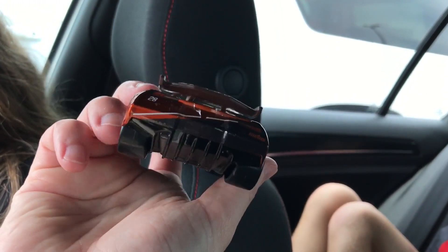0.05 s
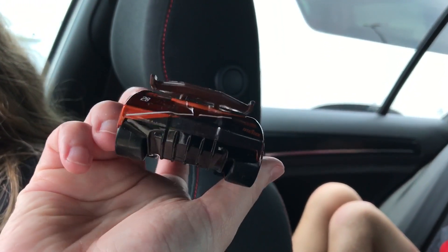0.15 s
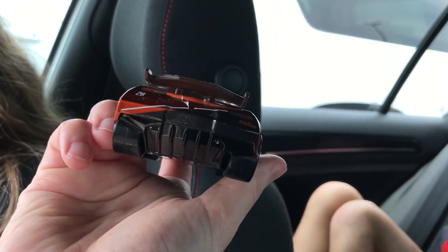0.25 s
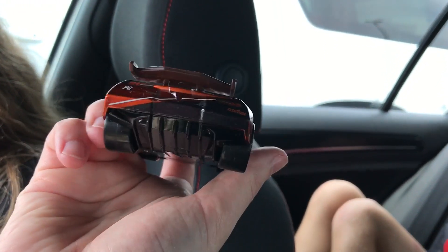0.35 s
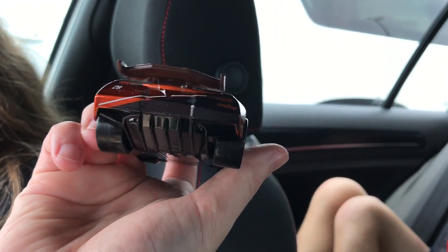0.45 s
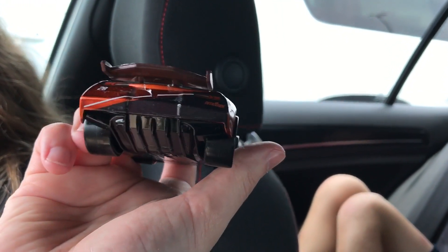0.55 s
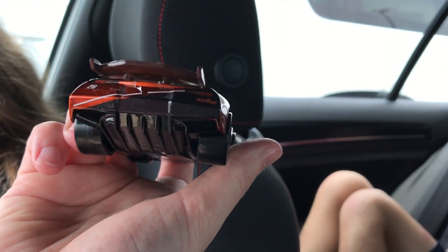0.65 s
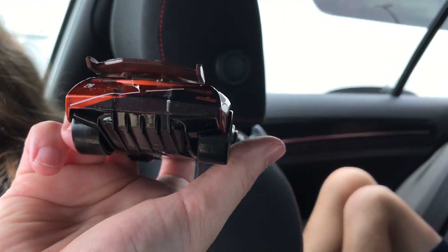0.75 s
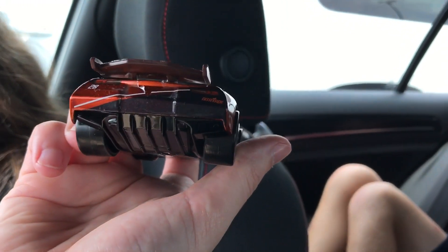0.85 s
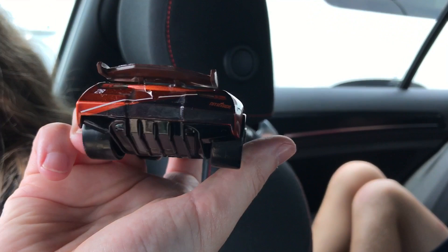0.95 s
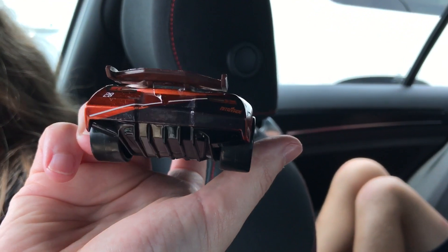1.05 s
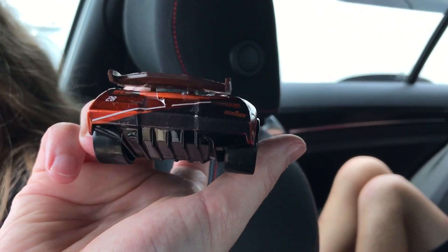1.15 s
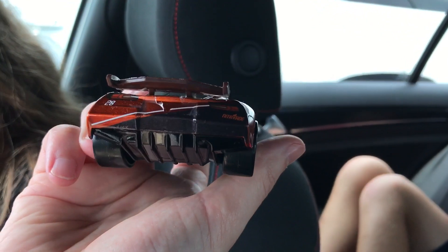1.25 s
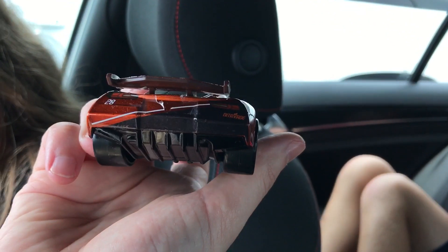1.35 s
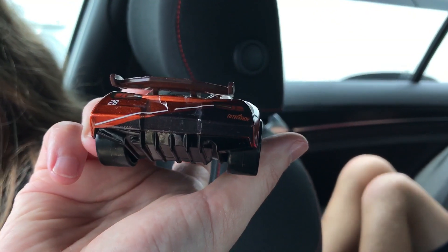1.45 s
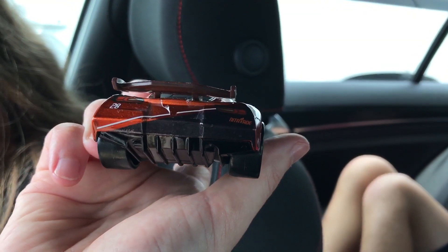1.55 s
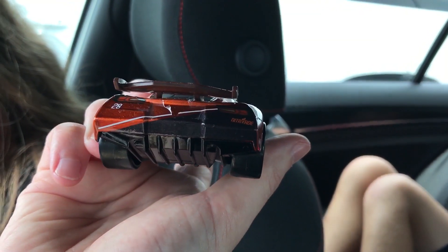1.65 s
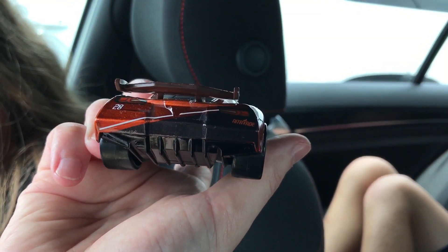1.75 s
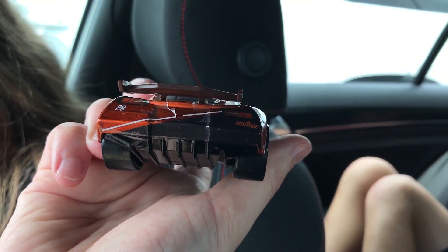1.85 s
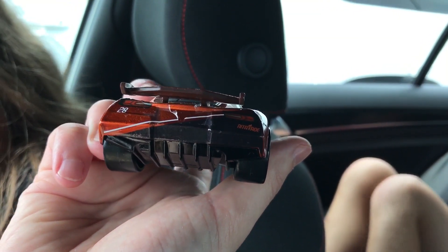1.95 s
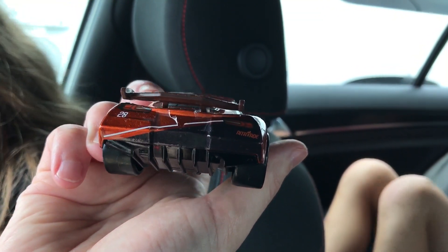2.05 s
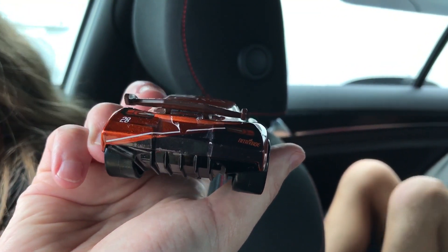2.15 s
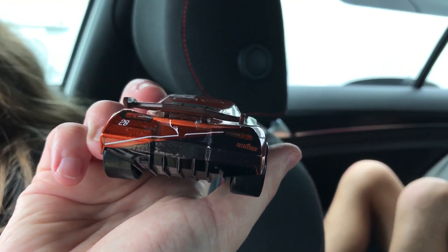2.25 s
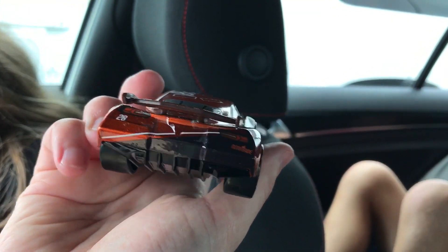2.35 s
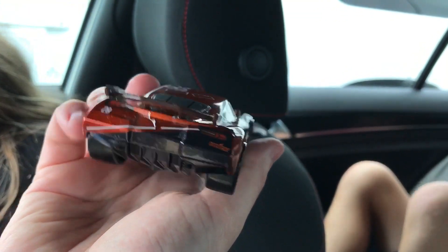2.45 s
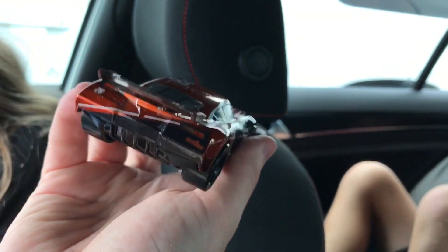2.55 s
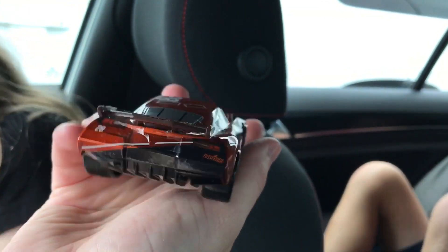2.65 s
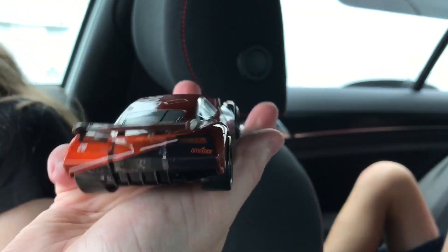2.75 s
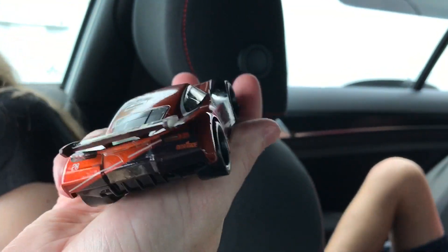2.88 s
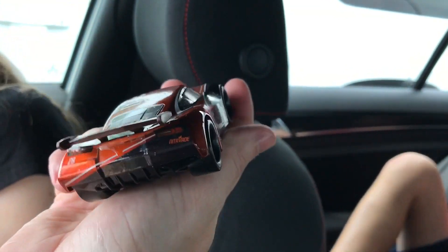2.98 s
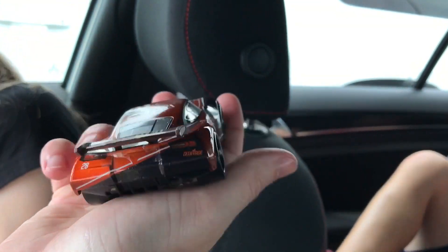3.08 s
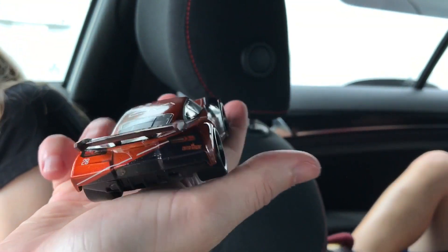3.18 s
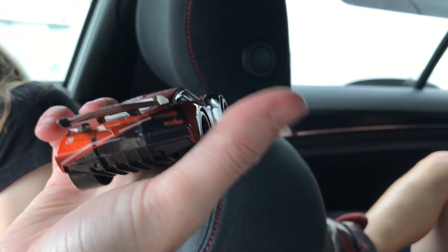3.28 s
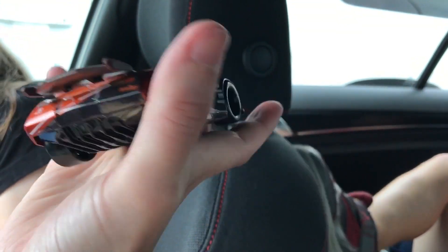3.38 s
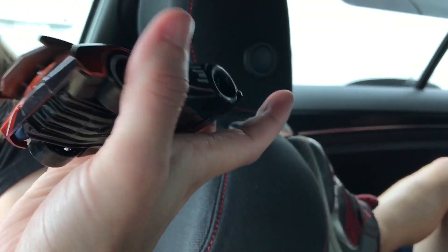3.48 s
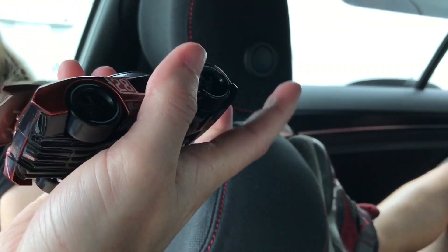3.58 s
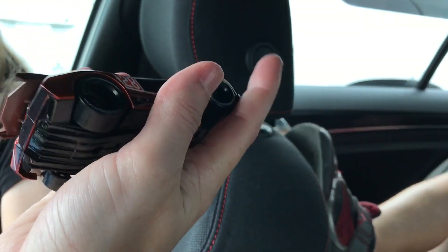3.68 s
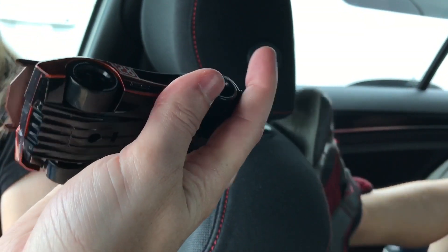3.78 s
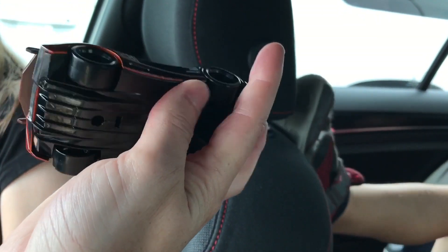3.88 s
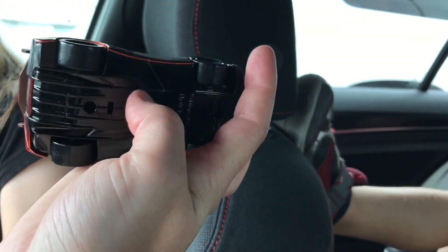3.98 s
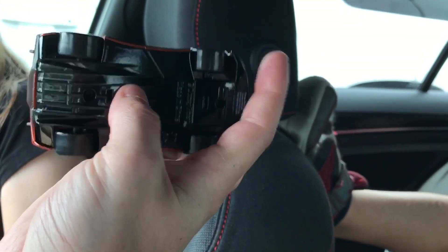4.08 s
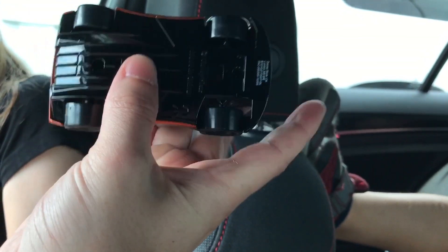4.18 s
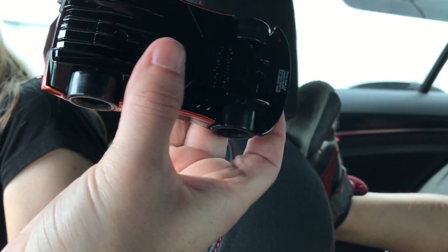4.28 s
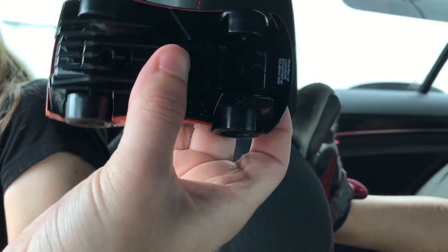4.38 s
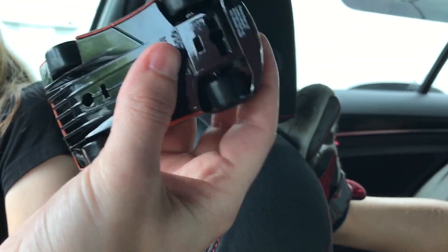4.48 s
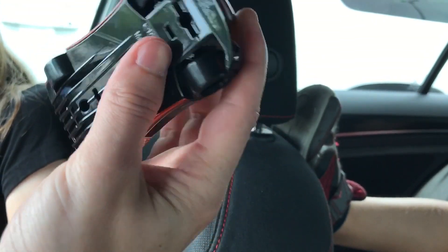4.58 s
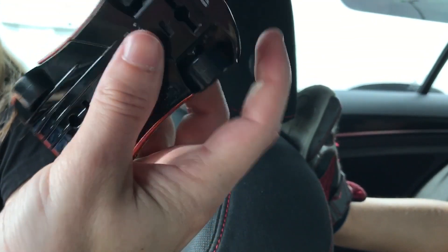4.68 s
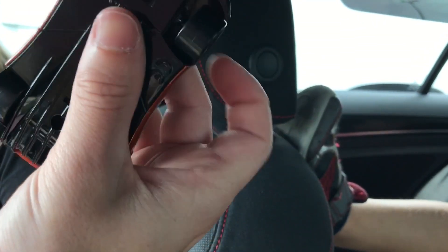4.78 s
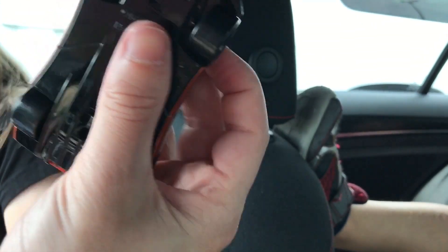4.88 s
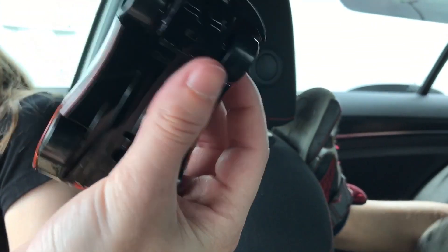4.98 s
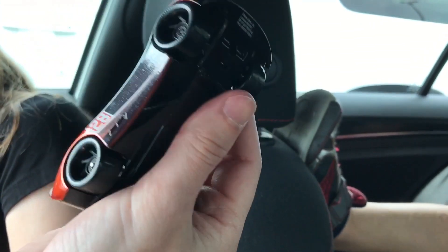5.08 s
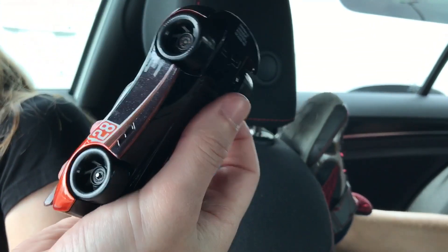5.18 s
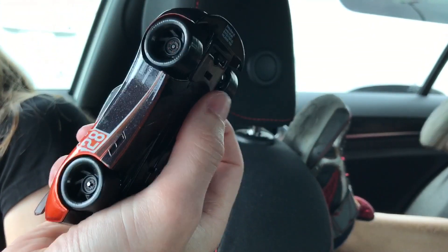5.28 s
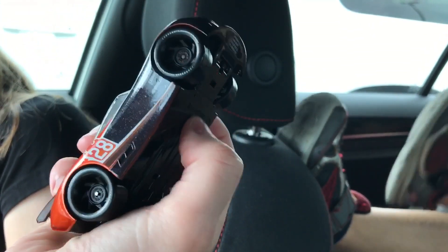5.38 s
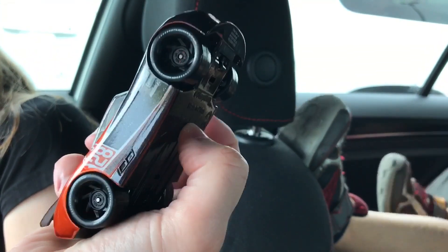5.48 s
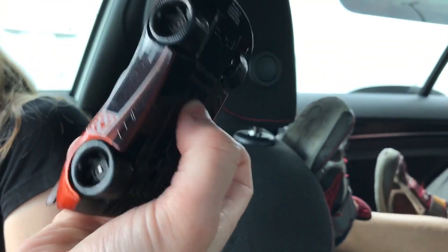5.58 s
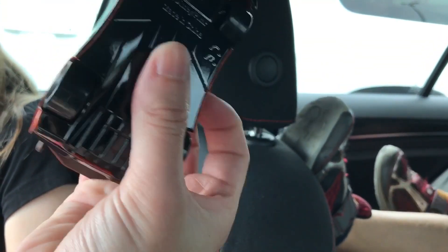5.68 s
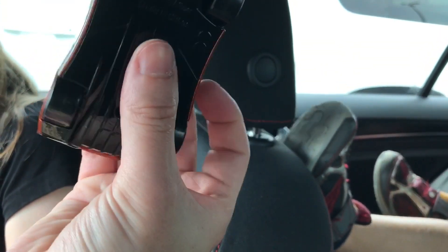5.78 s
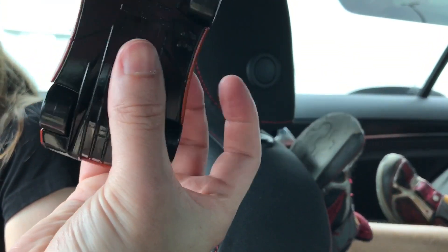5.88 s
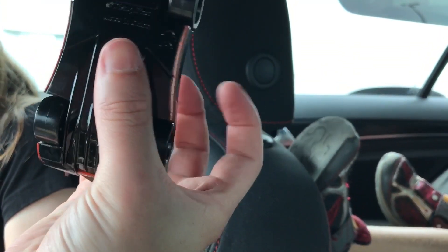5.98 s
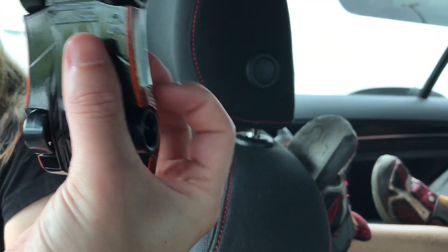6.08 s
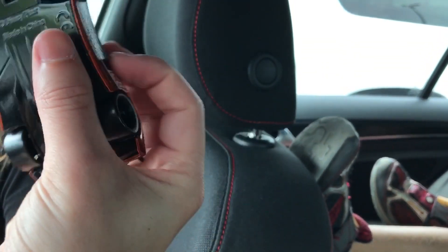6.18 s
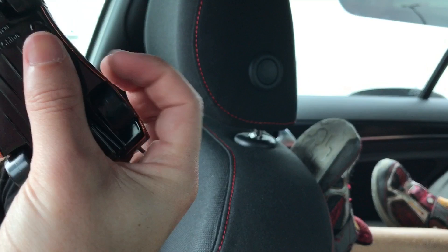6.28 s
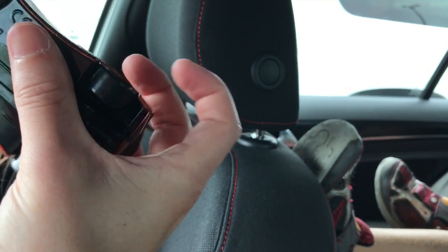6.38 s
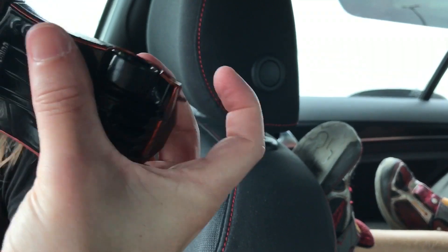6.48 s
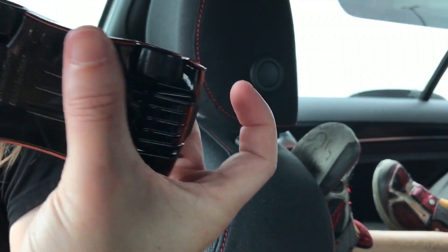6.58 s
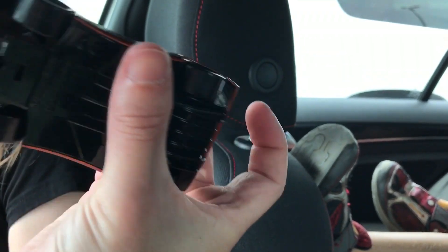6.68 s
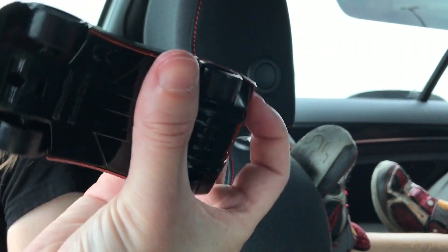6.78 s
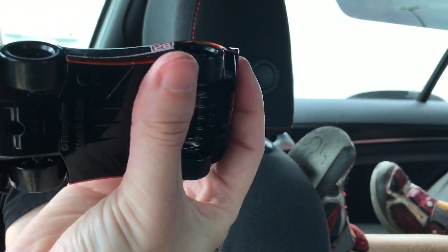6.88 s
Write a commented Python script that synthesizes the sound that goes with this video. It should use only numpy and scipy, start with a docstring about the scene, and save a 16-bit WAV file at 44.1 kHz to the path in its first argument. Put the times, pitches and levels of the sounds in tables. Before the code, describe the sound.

A car idles throughout, its low, smooth boomy hum and rumble slightly wavering beneath soft ventilation air with barely noticeable duct whistles. The sound is dry and close, in a small padded cabin. During the first two seconds there is only a small fingertip slip near 0.3 s and an even fainter one. From 2 s skin rubs lightly; at 2.4-2.6 s a cluster of bright, very short toy clacks comes with scratchy slips. A dull bump near 2.9 s precedes more clicks and finger snaps at 3.2-3.6 s. Quieter rustle and tiny loose-wheel ticks follow. Busy handling at 4.1-5.3 s brings crisp scratches, clacks at 4.4 s, a soft knock at 4.6 s and a strong clack near 4.8 s. The sharpest double clack lands around 5.8 s. After that, faint taps and soft rubbing dwindle until about 6.9 s while the idle continues.

```python
"""An engine idles and ventilation blows in a standing car: firing harmonics, shaped noise, faint duct whistles.
Close up, a hand turns a die-cast toy car over. Loose wheels and doors clack: struck modes plus noise chatter.
Fingertips slip and rub on the shell: crowds of snaps and friction noise through resonances.
Now and then something knocks dully in the cabin: modes that start high notes first."""
import sys
import numpy as np
from scipy import signal
from scipy.fft import rfft, irfft, next_fast_len
from scipy.io import wavfile

SR = 44100
rng = np.random.default_rng(int(sys.argv[2]) if len(sys.argv) > 2 else 0)


def output_pcm(signal):
    """Save a mono or channel-first signal as 16-bit PCM at the path in sys.argv[1].

    Samples are clipped to [-1, 1] before scaling.
    """
    pcm = np.clip(np.atleast_2d(signal).T, -1, 1) * 32767
    wavfile.write(sys.argv[1], SR, np.round(pcm).astype(np.int16))


N = 305613
T = np.arange(N) / SR


def from_db(db):
    """Decibels to gain."""
    return 10 ** (np.asarray(db) / 20)


def rms_one(x):
    """Scale to unit rms."""
    return x / np.sqrt(np.mean(x ** 2) + 1e-20)


def early(x):
    """Scale a short sound to unit rms over its first 10 ms."""
    return x / np.sqrt(np.mean(x[:SR // 100] ** 2))


def add(out, start_s, sound):
    """Mix a sound in at its time."""
    at = int(start_s * SR)
    out[at:at + len(sound)] += sound[:N - at]


def drift(knots_per_s):
    """Slow random curve, unit rms."""
    knots = rng.standard_normal(int(knots_per_s * N / SR) + 2)
    return rms_one(np.interp(T * knots_per_s, np.arange(len(knots)), knots))


def uneven_gains(spread_db, count, limit):
    """Random gains, normal in dB, clipped at limit spreads."""
    return from_db(spread_db * np.clip(rng.standard_normal(count), -limit, limit))


def colour(x, spectrum):
    """Shape by a (Hz, dB) spectrum, log-f interpolated, falling off past both ends; unit rms."""
    hz, db = np.transpose(spectrum)
    size = next_fast_len(len(x))
    f = np.maximum(np.arange(size // 2 + 1) * SR / size, 1)
    low_skirt = np.minimum(f / hz[0], 1) ** 2
    high_skirt = np.minimum(1.3 * hz[-1] / f, 1) ** 4
    gain = from_db(np.interp(np.log(f), np.log(hz), db)) * low_skirt * high_skirt
    return rms_one(irfft(rfft(x, size) * gain, size)[:len(x)])


def band(x, low_hz, high_hz, order=4):
    """Causal band-pass."""
    edges_hz = [low_hz, min(high_hz, SR / 2 - 1000)]
    return signal.sosfilt(signal.butter(order, edges_hz, "band", fs=SR, output="sos"), x)


def resonance(x, hz, width_hz):
    """One resonant peak; unit rms."""
    return rms_one(signal.lfilter(*signal.iirpeak(hz, hz / width_hz, fs=SR), x))


def struck(modes, t, vary_db, ring_time=1):
    """One decaying sine per mode; strength and sign depend on where the blow lands."""
    hz, db, t60_s = np.transpose(modes)[:, :, None]
    strength = from_db(db + vary_db * rng.standard_normal(hz.shape))
    sign = rng.choice([-1, 1], hz.shape)
    decay = from_db(-60 * t / (t60_s * max(ring_time, .2)))
    return sign * strength * np.sin(2 * np.pi * hz * t) * decay


def cabin(x, wet_db, t60_s):
    """Direct sound plus dense reflections from hand, glass and seats, soon soaked up."""
    t = T[:SR // 10]
    echoes = rng.standard_normal(len(t)) * from_db(-60 * t / t60_s) * (t > .001)
    response = from_db(wet_db) * echoes / np.linalg.norm(echoes)
    response[0] = 1
    return signal.fftconvolve(x, response)[:len(x)]


LIGHT_CLACK_DB = -42.5


def clack_registers(level_db, hardness_db):
    """dB of hollow body, shell ring, high ring, sharp edge: force and hardness move the sound upwards."""
    force_db = level_db - LIGHT_CLACK_DB
    body = -3 - hardness_db / 2
    ring = -5.5 + hardness_db / 2
    high = -21 + 0.26 * force_db + 0.37 * hardness_db
    edge = -18 + 0.062 * force_db + 0.14 * hardness_db
    return level_db + np.array([body, ring, high, edge])


# toy modes, free: f/Hz, relative level/dB, t60/s
TOY_MODES = [(1480, -19, .05), (1650, -21, .04), (1884, 0, .075), (1993, -5, .06), (2272, -10, .06),
             (2440, -10, .05), (3101, -3, .056), (3246, 0, .042), (3429, -8, .04), (3615, -7, .04),
             (3790, -8, .035), (3862, -2, .04), (4072, -8, .045), (4280, -8, .03), (4355, -5, .035),
             (4480, -11, .03), (4950, -20, .03), (5400, -17, .03), (5600, -13, .035), (5868, -8, .042),
             (7000, -23, .04), (8410, -28, .03), (9400, -25, .03), (11100, -25, .03), (12300, -25, .025),
             (13100, -21, .025), (14400, -25, .025)]
# clacks of loose parts: t/s, relative level/dB, hardness/dB (shell ring over hollow body),
# strongest body f/Hz, strongest shell f/Hz
CLACK_EVENTS = [(2.4085, -45, -3, 1940, 3090), (2.4425, -31.5, 10, 1940, 3870),
                (2.4502, -30.5, 3.5, 2270, 3800), (2.4553, -36, 6, 1790, 3800), (2.55, -22, 8, 1990, 3950),
                (2.9147, -36, 5, 2020, 3470), (3.1612, -35.5, 20.5, 2300, 3850),
                (3.1768, -27.5, 2.5, 2000, 3680), (3.3592, -33, 5.5, 1442, 3860),
                (3.5552, -53, -12, 1890, 3260), (3.5924, -41, -0.5, 2010, 3000),
                (3.681, -42, -8, 1780, 4370), (4.051, -49, 3, 1850, 3420), (4.263, -42.5, -0.5, 1740, 3870),
                (4.3935, -23.5, 0.5, 1830, 3500), (4.4982, -46.5, -12, 1850, 3780),
                (4.6061, -41.5, -2, 1890, 3170), (4.6351, -43, -1, 1910, 3090),
                (4.768, -18.5, 9.5, 1860, 3330), (4.814, -48.5, -19, 1880, 3080),
                (4.8688, -34, 0.5, 1930, 3020), (4.9728, -46.5, 1, 1940, 3260),
                (5.0862, -47, -0.5, 1930, 3220), (5.1487, -44, 2, 1970, 3740),
                (5.3023, -49, -2, 1430, 3060), (5.3299, -48, 8.5, 1470, 3020),
                (5.7816, -16.5, 7.5, 1920, 4280), (5.8093, -22.5, 2, 1880, 3590),
                (6.151, -43.5, -13, 1900, 3220), (6.1856, -47, -12, 1890, 3140),
                (6.2581, -45, -6.5, 1900, 4360), (6.337, -40.5, -2, 1940, 3500),
                (6.3434, -41, 1, 1860, 3600), (6.57, -55, -5, 1910, 3630), (6.6009, -54.5, 6, 1490, 3070),
                (6.695, -40.5, -3.5, 1750, 3140), (6.7205, -40.5, 7.5, 1950, 3540),
                (6.8672, -50.5, 2.5, 1880, 4260)]


def clacks(focus_db=10.5, focus_log_width=0.041, low_focus=6.1, crack_t60_s=0.031, rise_s=0.00026,
           scuff_db=-18.0):
    """Each contact rings the toy's modes over a chatter of parts; the spot hit favours some modes."""
    out, t, lead_s = np.zeros(N), T[:SR // 12], T[:SR // 100]
    mode_hz = np.array(TOY_MODES)[:, 0]
    build_up = 1 - np.exp(-t / rise_s)
    settling = from_db(-60 * t / crack_t60_s)
    # body, ring, high, edge: low Hz, high Hz, chatter share
    registers = [(1400, 2500, 0.195), (3000, 4700, 0.39), (4700, 6300, 0.39), (6300, 17000, 1.2)]
    noise_shape = (len(CLACK_EVENTS), len(t))
    noises = [band(rng.standard_normal(noise_shape), low, high, order=3) for low, high, _ in registers]
    for k, (s, level_db, hardness_db, body_hz, shell_hz) in enumerate(CLACK_EVENTS):
        levels_db = clack_registers(level_db, hardness_db)
        gains = from_db(levels_db)
        nearness = sum(np.exp(-(np.log(mode_hz / hz) / focus_log_width) ** 2) for hz in (body_hz, shell_hz))
        # the lowest modes only speak when hit squarely
        favour_db = focus_db * nearness * np.where(mode_hz < 1750, low_focus, 1)
        # the hand leaves 0.8 of the free ring time
        modes = struck(TOY_MODES, t, vary_db=5.0, ring_time=.8) * from_db(favour_db)[:, None]
        sound = 0
        for (low_hz, high_hz, chatter_share), noise, gain in zip(registers, noises, gains):
            tone = modes[(mode_hz >= low_hz) & (mode_hz < high_hz)].sum(0)
            chatter = noise[k] * settling
            sound = sound + gain * early(build_up * (early(tone) + chatter_share * early(chatter)))
        add(out, s, np.linalg.norm(gains) * early(cabin(sound, wet_db=-6.5, t60_s=0.042)))
        # the part slides for an instant before it hits its stop
        scuff = colour(rng.standard_normal(len(lead_s)), RUB_SPECTRUM) * lead_s / lead_s[-1]
        add(out, s - lead_s[-1], from_db(levels_db[1] + scuff_db) * scuff)
    return out


# snapping skin: f/Hz, relative density/dB per Hz
SNAP_SPECTRUM = [(1500, -3), (1950, -0.5), (2600, -5), (3800, -1.5), (5400, -13), (7000, -3.5),
                 (7900, -4.5), (9500, 0.5), (10500, -6), (12500, 4), (16000, -1.5)]
# fingertip slips: t/s, relative level/dB, envelope time/s
SLIP_EVENTS = [(.264, -37.5, .007), (.555, -55, .003), (2.525, -24.5, .0065), (2.602, -24, 0.011),
               (2.614, -24, 0.0079), (2.668, -33, 0.0065), (2.886, -36, .0046), (3.345, -29.5, 0.007),
               (3.369, -23.5, 0.0065), (3.408, -34, 0.013), (4.079, -37.5, 0.02), (4.113, -33.5, 0.0075),
               (4.158, -39, .0066), (4.229, -45, .007), (4.341, -22, 0.011), (4.378, -18.5, 0.0073),
               (4.408, -33, 0.0086), (4.522, -31, 0.0083), (4.601, -34, 0.0078), (4.634, -39, 0.0044),
               (4.663, -30, .007), (4.76, -19, 0.013), (4.861, -39, 0.0087), (4.953, -28.5, 0.014),
               (5.224, -35, .009), (5.239, -32, 0.0095), (5.262, -37, 0.0046), (5.284, -36.5, 0.0047),
               (5.294, -25, .008), (5.518, -37.5, .01), (5.654, -45, .004), (5.799, -26, .008),
               (6.185, -41, .006), (6.319, -45, .006), (6.799, -47, .004), (6.893, -47.5, 0.0072)]


def slips(offset_db=-14.5, grain_db=8.0, ring_share=0.51, squeak_width_hz=250.0, squeak_count=6,
          clump_db=3.5, clumps_per_s=500.0, plain_slip_db=-25.5, sharpness_db_per_db=0.54):
    """Skin lets go of the paint in a quick crowd of tiny snaps, with random high squeaky peaks."""
    out, t = np.zeros(N), T[:SR // 15]
    for s, level_db, length_s in SLIP_EVENTS:
        # firmer slips lift the highest treble
        sharp_db = sharpness_db_per_db * (level_db - plain_slip_db)
        skin = [(hz, db + np.interp(hz, [7000, 14000], [0, sharp_db])) for hz, db in SNAP_SPECTRUM]
        snaps = rng.standard_normal(len(t)) * uneven_gains(grain_db, len(t), 2)
        clump_curve = np.interp(t * clumps_per_s, np.arange(len(t)), rng.standard_normal(len(t)))
        age = t / max(length_s, .002)
        envelope = np.sqrt(age) * np.exp(-2 * age)
        scratch = colour(snaps, skin) * from_db(clump_db * clump_curve) * envelope
        squeak_hz = rng.uniform(3860, 15500, squeak_count)
        squeak = sum(resonance(scratch, hz, squeak_width_hz) for hz in squeak_hz)
        sound = cabin(early(scratch) + ring_share * early(squeak), wet_db=-11.5, t60_s=0.04)
        add(out, s, from_db(level_db + offset_db) * early(sound))
    return out


# strokes of skin over the toy: t/s, length/s, relative rustle level/dB, fine hiss re rustle/dB
STROKE_EVENTS = [(1.984, 0.17, -68, -6.5), (2.325, 0.62, -64, -5), (3.104, 0.25, -61, -9.5),
                 (3.454, 0.19, -58.5, -9.5), (3.903, 0.051, -57, -8), (4.037, 0.19, -60, -7.5),
                 (4.41, 0.49, -64, -8), (4.956, 0.48, -68.5, -3.5), (5.508, 0.056, -68, 2.5),
                 (5.67, 0.076, -60.5, -11.5), (5.95, .1, -67, -10), (6.186, 0.39, -66, -19),
                 (6.808, 0.083, -63.5, -16)]


def hand_movement(turning_from_s=1.9, attack_s=0.044, release_s=0.087, grip_rustle_db=-73, grip_hiss_db=-80.5):
    """Gains of rustle and fine hiss: strokes swell, hold and fade over the faint shifting of the grip."""
    turning = np.clip((T - turning_from_s) / attack_s, 0, 1)
    rustle, hiss = from_db(grip_rustle_db) * turning, from_db(grip_hiss_db) * turning
    for s, length_s, rustle_db, hiss_db in STROKE_EVENTS:
        swell = (T - s) / attack_s
        fade = 1 - (T - s - length_s) / release_s
        stroke = np.clip(np.minimum(swell, fade), 0, 1)
        rustle = np.maximum(rustle, from_db(rustle_db) * stroke)
        hiss = np.maximum(hiss, from_db(rustle_db + hiss_db) * stroke)
    return rustle, hiss


# skin rubbing on the toy: f/Hz, relative density/dB per Hz
RUB_SPECTRUM = [(1500, -1), (1950, 7), (2700, 8), (3400, -9.5), (4400, -7.5), (4800, -4.5), (5700, -2),
                (7800, -6), (9400, -2), (10500, -10), (12500, -7), (16000, -4)]
# resonances that sliding skin brings out: f/Hz, width/Hz, relative level/dB
GRIP_RESONANCES = [(1870, 140, 4), (2990, 250, -1.5), (3730, 100, -0.5), (4320, 148, -5), (5200, 450, -1),
                   (6970, 280, -2.5), (8340, 600, -8.5), (9460, 450, -11.5), (12300, 500, -4.5),
                   (13300, 700, -8)]


def rubbing(hiss_db=1.5, grain_db=4.5, flutter_db=2.0, ring_share=0.27, grain_share=.9,
            catches_per_s=600.0, grip_db=4.0):
    """Skin slides in a fine hiss with small catches; the shifting grip frees one resonance, then another."""
    rustle, hiss = hand_movement()
    flutter = from_db(flutter_db * drift(110))
    sizes = rng.choice([-1, 1], N) * uneven_gains(grain_db, N, 2)
    catches = rms_one((rng.random(N) < catches_per_s / SR) * sizes)
    friction = rms_one(rng.standard_normal(N) + grain_share * catches)
    ringing = 0
    for hz, width_hz, db in GRIP_RESONANCES:
        ringing = ringing + from_db(db + grip_db * drift(7.4)) * resonance(friction, hz, width_hz)
    sound = colour(friction, RUB_SPECTRUM) + ring_share * ringing
    soft = rustle * rms_one(band(sound, 1400, 5300))
    fine = hiss * from_db(hiss_db) * rms_one(band(sound, 6600, 17600))
    return flutter * (soft + fine)


def loose_parts(level_re_rustle_db=-5.5, ticks_per_s=55.0, spread_db=7.0, part_count=4):
    """Wheels and doors tick in their play as the hand moves; each part rings the toy in its own way."""
    out = 0
    for part in range(part_count):
        sizes = uneven_gains(spread_db, N, 1.5)
        ticks = (rng.random(N) < ticks_per_s / part_count / SR) * sizes
        ring = struck(TOY_MODES, T[:SR // 20], vary_db=5.5, ring_time=0.66).sum(0)
        out = out + signal.oaconvolve(ticks, np.diff(ring))[:N]
    rustle, _ = hand_movement()
    return rustle * from_db(level_re_rustle_db) * rms_one(out)


# knock modes: f/Hz, relative level/dB, t60/s
KNOCK_MODES = [(231, -1, 0.045), (344, -2, 0.061), (426, -8, .04), (554, -6.5, 0.04), (698, 0, 0.032),
               (1170, -6, 0.021), (1463, 0.5, 0.026), (2470, -2.5, 0.008)]
# dull knocks: t/s, peak level/dB
KNOCK_EVENTS = [(2.883, -33), (3.06, -43.5), (4.5812, -32)]


def knocks(lag_cycles=2.2):
    """Soft bumps on a panel: bending waves bring the high notes first, the low ones later."""
    out, t = np.zeros(N), T[:SR // 7]
    mode_hz = np.array(KNOCK_MODES)[:, :1]
    since_arrival_s = np.maximum(t - lag_cycles / mode_hz, 0)
    for s, peak_db in KNOCK_EVENTS:
        thud = struck(KNOCK_MODES, since_arrival_s, vary_db=0.0).sum(0)
        thud = cabin(thud, wet_db=-6.5, t60_s=0.1)
        add(out, s, from_db(peak_db) * thud / np.abs(thud).max())
    return out


# idle speed: t/s, nominal f/Hz of the fourth multiple of the firing rate
IDLE_SPEED = [(0.0, 106.9), (5.87, 106.9), (5.96, 105.6), (6.46, 105.6), (6.56, 106.9), (6.93, 107.0)]
# cabin boom: multiple of the firing rate, nominal rms level/dB
BOOM_HARMONICS = [(2, -46.5), (3, -52), (4, -47.5), (5, -66), (6, -58), (7, -64.5), (10, -74), (13, -67.5),
                  (17, -65.5)]
# engine rumble through the body: f/Hz, relative density/dB per Hz
RUMBLE_SPECTRUM = [(20, -18.5), (32, -15), (48, -1.5), (70, -2.5), (110, -4), (140, -4.5), (175, -5.5),
                   (230, -13), (330, -16), (430, -15.5), (490, -33.5), (700, -44.5)]


def engine(waver_db=2.0, rumble_rms_db=-46.5):
    """Firing pulses boom in the cabin as low harmonics over a rumble."""
    s, fourth_hz = np.transpose(IDLE_SPEED)
    firing_hz = np.interp(T, s, fourth_hz) / 4 * (1 + .003 * drift(5))
    firings = np.cumsum(firing_hz) / SR
    hum = 0
    for multiple, db in BOOM_HARMONICS:
        hum = hum + from_db(db + waver_db * drift(6)) * np.sin(2 * np.pi * round(multiple) * firings)
    rumble = colour(rng.standard_normal(N), RUMBLE_SPECTRUM)
    return np.sqrt(2) * hum + from_db(rumble_rms_db) * rumble  # sqrt(2): rms to peak


# ventilation air: f/Hz, relative density/dB per Hz
AIR_SPECTRUM = [(350, -18.5), (520, -8.5), (620, -8.5), (710, -15), (920, 1.5), (1050, -12.5), (1220, -5),
                (2000, -21), (3400, -25), (4400, -32.5), (5700, -31.5), (7500, -39.5), (10500, -40.5),
                (13000, -41)]
# duct whistles: f/Hz, width/Hz, rms level/dB
DUCT_WHISTLES = [(632.5, 12, -75), (941, 42, -66), (1200, 25, -75), (1362, 28, -74.5), (1824, 24, -77.5),
                 (2174, 42, -84.5), (3400, 31, -84)]


def ventilation(air_rms_db=-55.0):
    """Steady air through the ducts, which whistle faintly: noise through narrow resonances."""
    whistles = 0
    for hz, width_hz, db in DUCT_WHISTLES:
        # two equal peaks in series are narrower than one, hence 1.8
        once = resonance(rng.standard_normal(N), hz, 1.8 * width_hz)
        whistles = whistles + from_db(db) * resonance(once, hz, 1.8 * width_hz)
    air = from_db(air_rms_db) * colour(rng.standard_normal(N), AIR_SPECTRUM)
    return air + whistles


def scene():
    """The toy handled up close in the idling cabin."""
    cabin_air = engine() + ventilation()
    handling = clacks() + slips() + knocks() + rubbing() + loose_parts()
    return (cabin_air + handling)[None]


def record(dry, cutoff_hz=15900):
    """The top is cut steeply."""
    return signal.sosfilt(signal.ellip(10, .1, 80, cutoff_hz, fs=SR, output="sos"), dry)


dry = scene()
out = record(dry)
output_pcm(out)
```